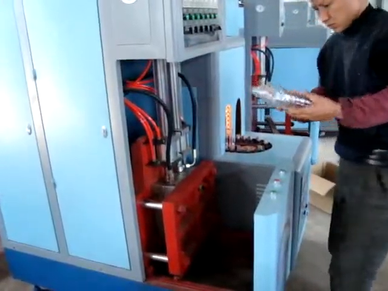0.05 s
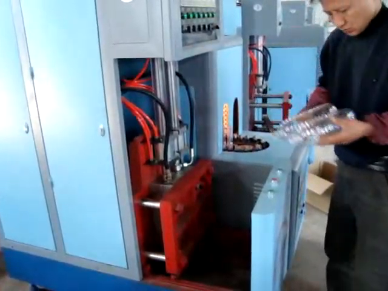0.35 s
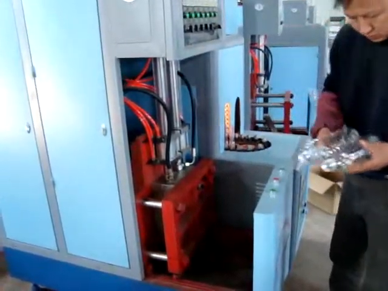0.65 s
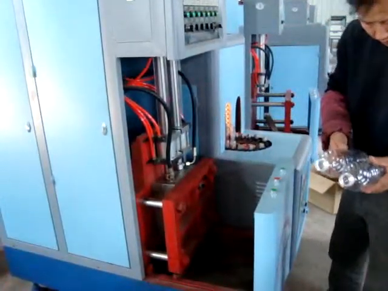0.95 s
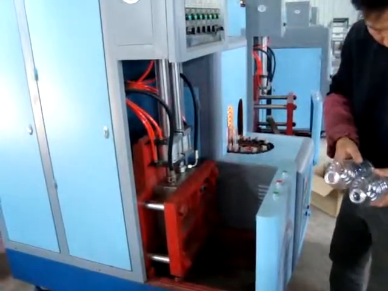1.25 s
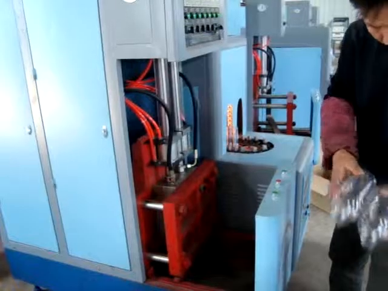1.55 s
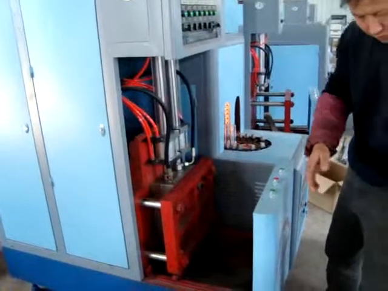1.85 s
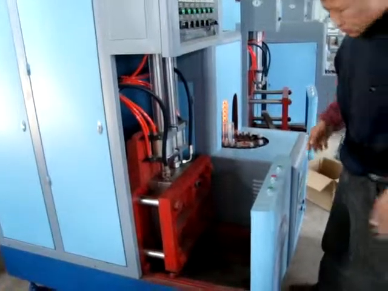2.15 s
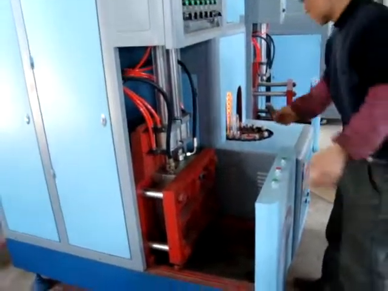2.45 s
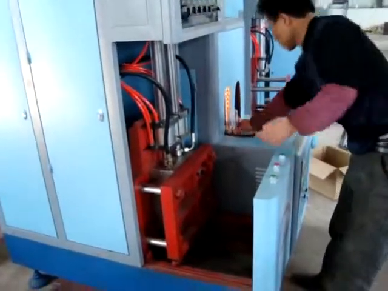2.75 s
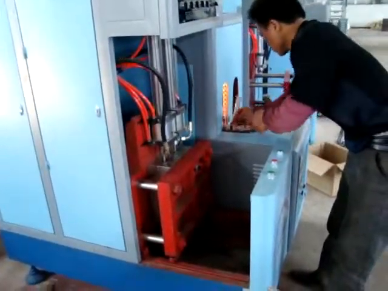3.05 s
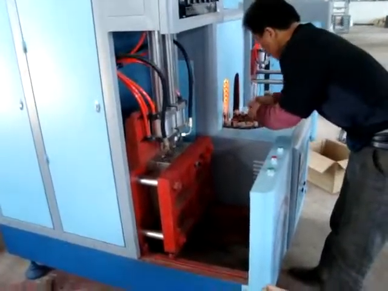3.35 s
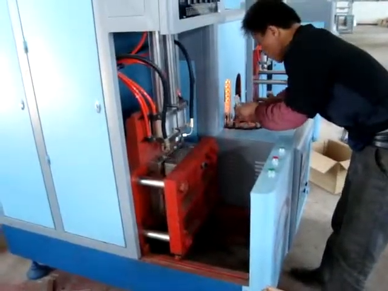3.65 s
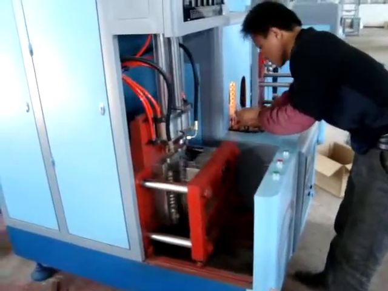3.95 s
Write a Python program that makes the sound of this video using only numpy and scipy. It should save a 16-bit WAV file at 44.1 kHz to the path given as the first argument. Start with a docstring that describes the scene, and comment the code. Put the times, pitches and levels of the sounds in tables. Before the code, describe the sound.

Compressed air spits from a bottle blowing machine and fades to a soft hiss over workshop din. Empty plastic bottles clatter on the floor, then a fresh jet hisses, followed by a loud, faintly whistling rush of exhaust air.

```python
"""Bottle blowing machine in a workshop

Valves spit and vent compressed air, whose turbulence radiates broadband noise. Two empty plastic bottles
drop and clatter, each impact exciting the modes of their shells. A fresh jet hisses, then air rushes out
of a resonant exhaust pipe. Short reflections in the sheet metal cabinet colour the air noise, and a motor
hums in the din of the shop."""
import sys
import numpy as np
from scipy import signal
from scipy.fft import rfft, irfft, next_fast_len
from scipy.io import wavfile
from scipy.ndimage import map_coordinates

SR = 44100
rng = np.random.default_rng(int(sys.argv[2]) if len(sys.argv) > 2 else 0)


def unload_wav(signal):
    """Save mono or channel-first audio to the path in sys.argv[1] as 16-bit WAV at rate SR, clipped to [-1, 1]."""
    wavfile.write(
        sys.argv[1],
        SR,
        np.round(np.clip(np.atleast_2d(signal).T, -1, 1) * 32767).astype(np.int16),
    )


N = 176400
TIME = np.arange(N) / SR


def amp(db):
    """Amplitude ratio of a level in decibels."""
    return 10 ** (np.asarray(db) / 20)


def unit(x):
    """Normalisation to rms 1."""
    return x / np.sqrt(np.mean(x ** 2) + 1e-20)


def along(points, hz):
    """Interpolation on a logarithmic frequency axis."""
    freqs, values = np.transpose(points)
    return np.interp(np.log(hz + 1e-3), np.log(freqs + 1e-3), values)


def envelope(points):
    """Amplitude envelope, interpolated in decibels."""
    return amp(np.interp(TIME, *np.transpose(points)))


def wobble(rate):
    """Smooth random modulation with rate knots a second."""
    return map_coordinates(rng.standard_normal(N // 50), [TIME * rate], mode="mirror")


def filtered(x, response):
    """Linear filtering: the spectrum is multiplied by a frequency response."""
    size = next_fast_len(N + SR // 2)
    return irfft(rfft(x, size) * response(np.fft.rfftfreq(size, 1 / SR)), size)[:N]


def noise(colour_db):
    """Spectrally shaped Gaussian noise of rms 1."""
    return unit(filtered(rng.standard_normal(N), lambda hz: amp(colour_db(hz))))


def narrow(centre, width):
    """Random excitation of a single resonance, at rms 1."""
    return noise(lambda hz: -20 * np.log10(1 + (2 * (hz - centre) / width) ** 2))


def lifts(peaks, hz):
    """Gain in decibels of bell-shaped resonance peaks."""
    return sum(db / (1 + (2 * (hz - centre) / width) ** 2) for centre, width, db in peaks)


CABINET_DB, CABINET_T60_S = -7, .05
def air(colour_db, flutter_db):
    """Comb filtering: turbulent noise interferes with its cabinet reflections; the sum has rms 1."""
    t = np.arange(SR // 10) / SR
    echoes = rng.standard_normal(len(t)) * amp(-60 * t / CABINET_T60_S) * (t > .003)
    echoes *= amp(CABINET_DB) / np.linalg.norm(echoes)
    direct = noise(colour_db) * amp(flutter_db * (wobble(21) + wobble(90)))
    return unit(direct + signal.fftconvolve(direct, echoes)[:N])


def valve(opens, closes, db, sag, attack_s, release_s):
    """Exponential relaxation: flow rises on opening, sags with the pressure and dies after closing."""
    age = np.maximum(TIME - opens, 0)
    rise = 1 - np.exp(-age / attack_s)
    fall = np.exp(-np.maximum(TIME - closes, 0) / release_s)
    return amp(db - sag * age) * rise * fall


# Openings of the jet valves: open_s, close_s, level_db, sag_db_per_s
JETS = [(-.02, 0.195, -20.5, 12), (0.204, 1.0, -35.5, 39), (2.03, 2.79, -25, 15), (2.846, 3.198, -25, -2)]
# Jet spectrum: frequency_hz, level_db
JET_COLOUR = [(300, -39), (1000, -34), (2000, -4.5), (4000, -6.5), (6000, -3.5), (8000, -3), (9800, -1.5)]
SURGE_DB, SURGE_S = 4, .03
def jets():
    """Turbulent jet noise: air at full pressure hisses brightly, surging as each valve opens."""
    out = np.zeros(N)
    for opens, closes, db, sag in JETS:
        surge = amp(SURGE_DB * np.exp(-np.abs(TIME - opens) / SURGE_S))
        flow = valve(opens, closes, db, sag, attack_s=.004, release_s=.02)
        out += surge * flow * air(lambda hz: along(JET_COLOUR, hz), flutter_db=.95)
    return out


# Envelope of the exhaust rush: time_s, level_db
RUSH_LEVEL = [(2.87, -74), (2.876, -23), (2.94, -20.5), (3.13, -21.5), (3.28, -23), (3.45, -22),
              (3.65, -22), (3.85, -20.5), (4, -21.5)]
# Spectrum of the rush: frequency_hz, level_db
RUSH_COLOUR = [(120, -54), (200, -38), (361, -34), (391, -27.5), (552, -26.5), (804, -15.5), (979, -15.5),
               (1130, -7.5), (2740, 1), (9370, -8), (10000, -8), (13000, -56), (22000, -120)]
# Pipe resonances: centre_hz, width_hz, lift_db
PIPE_PEAKS = [(1165, 90, 3), (2280, 80, 2.5), (3190, 91, -3), (5430, 1800, 3)]
# Envelope of the lower roar: time_s, level_db
ROAR_LEVEL = [(2.9, -43), (3.3, -41.5), (3.65, -42), (3.82, -32), (4, -27.5)]
# Spectrum of the roar: frequency_hz, level_db
ROAR_COLOUR = [(200, -41), (550, -17), (800, -10), (1150, -6), (1800, -2), (3000, -10), (10000, -25)]
SPIT_PER_S, SPIT_DB = 90, -20
def exhaust():
    """Source and filter: pipe resonances shape rushing air and droplets while a lower roar builds."""
    colour = lambda hz: along(RUSH_COLOUR, hz) + lifts(PIPE_PEAKS, hz)
    rush = air(colour, flutter_db=.51)
    droplets = rng.uniform(-1, 1, N) * (rng.random(N) < SPIT_PER_S / SR)
    spit = amp(SPIT_DB) * unit(filtered(droplets, lambda hz: amp(colour(hz))))
    roar = envelope(ROAR_LEVEL) * air(lambda hz: along(ROAR_COLOUR, hz), flutter_db=.2)
    is_open = TIME > RUSH_LEVEL[0][0]
    return is_open * (envelope(RUSH_LEVEL) * (rush + spit) + roar)


# Floor contacts of two bouncing bottles: start_s, level_db
LANDINGS = [(1.926, -21.5), (1.9365, -11.5), (1.9405, -10.5), (1.9541, -14.5), (1.9572, -13),
            (1.965, -13.5), (1.976, -30), (1.998, -18.5), (2.017, -23.5), (2.038, -31), (2.05, -26)]
# Modes of the hollow shell: pitch_hz, level_db
SHELL_MODES = [(268, -10), (405, -1), (432, -1.5), (480, -5), (548, -4), (640, -10.5), (780, -10.5),
               (915, -4.5), (1002, -1), (1243, 3.5), (1565, 4), (1800, -4.5), (2280, -8), (2660, 0)]
# Spectrum of the shaken walls: frequency_hz, level_db
CLASH_COLOUR = [(30, -42), (110, -25), (170, -26.5), (260, -7), (330, -6.5), (420, 2), (650, -4), (1000, 0),
                (1550, -3.5), (2700, -4.5), (4000, -9.5), (6000, -13), (10000, -17.5)]
# Decay of the wall vibration: frequency_hz, t60_s
CLASH_T60 = [(100, 0.59), (400, 0.14), (1500, 0.19), (4000, 0.09), (9000, 0.018)]
RING_DB, CLASH_DB, CRACK_DB = -5, -1.5, -3.5
RING_T60_AT_1KHZ_S, DAMPING_EXPONENT = .18, .17
CRACK_HZ, CRACK_WIDTH_HZ, CRACK_T60_S = 2600, 4600, .012
CONTACT_RISE_S, CLATTER_END_S, CLATTER_FADE_S = .00063, 2.053, .005
CLATTER_LOW_CUT_HZ = 130  # a high-pass filter keeps deep bass out of the clatter
def bottles():
    """Impact excitation: each contact cracks, rings the shell's damped modes and shakes its walls."""
    out, t = np.zeros(N + SR), np.arange(SR // 2) / SR
    hz, mode_db = np.transpose(SHELL_MODES)[:, :, None]
    weights = amp(mode_db) / np.linalg.norm(amp(mode_db))
    decay = amp(-60 * t * (hz / 1000) ** DAMPING_EXPONENT / RING_T60_AT_1KHZ_S)
    rise = 1 - np.exp(-t / CONTACT_RISE_S)
    for start, db in LANDINGS:
        modes = np.sin(2 * np.pi * (hz * t + rng.random(hz.shape)))
        ring = amp(RING_DB) * (weights * modes * decay).sum(0)
        walls = noise(lambda f: along(CLASH_COLOUR, f))[:len(t)]
        band_hz, age, bands = signal.stft(walls, SR, nperseg=256)
        bands *= amp(-60 * age / along(CLASH_T60, band_hz)[:, None])
        clash = amp(CLASH_DB) * signal.istft(bands, SR, nperseg=256)[1][:len(t)]
        crack = narrow(CRACK_HZ, CRACK_WIDTH_HZ)[:len(t)] * amp(CRACK_DB - 60 * t / CRACK_T60_S)
        out[round(start * SR):][:len(t)] += amp(db) * (ring + clash + crack) * rise
    highpass = signal.butter(2, CLATTER_LOW_CUT_HZ, "highpass", fs=SR, output="sos")
    abrupt_end = np.exp(-np.maximum(TIME - CLATTER_END_S, 0) / CLATTER_FADE_S)
    return signal.sosfilt(highpass, out[:N]) * abrupt_end


# Puff spectrum: frequency_hz, level_db
PUFF_COLOUR = [(60, -45), (200, -28), (355, -26), (440, -18), (600, -24), (770, -13), (1000, -13),
               (1550, 0), (2200, -4.5), (3400, -8), (4500, -14), (10000, -23)]
def puff():
    """Transient flow: a switching valve releases one ragged burst of turbulence."""
    flow = valve(opens=.021, closes=.058, db=-19.5, sag=0, attack_s=.002, release_s=.034)
    return flow * air(lambda hz: along(PUFF_COLOUR, hz), flutter_db=.9)


# Venting of the cylinder ports: open_s, close_s, level_db, sag_db_per_s, centre_hz
BLEEDS = [(-.02, 1.37, -33, 11.5, 1780), (1.375, 2.4, -40, 24, 3180), (2.038, 2.87, -30, 3.5, 2400)]
# Port spectrum: ratio_to_centre, level_db
BLEED_COLOUR = [(.1, -39.5), (.33, -21.5), (.5, -10), (.75, -8), (1, -2.5), (1.4, -4.5), (2, -9),
                (3, -10.5), (5, -19.5)]
# Housing resonances around the ports: centre_hz, width_hz, lift_db
HOUSING_PEAKS = [(1490, 560, 5), (2050, 270, 0.5), (2680, 520, 3), (4040, 530, 1.5)]
def bleeds():
    """Orifice noise: emptying cylinders hiss softly, each port about its own centre frequency."""
    out = np.zeros(N)
    for *opening, centre in BLEEDS:
        hiss = air(lambda hz: along(BLEED_COLOUR, hz / centre) + lifts(HOUSING_PEAKS, hz), flutter_db=.5)
        out += valve(*opening, attack_s=.002, release_s=.02) * hiss
    return out


# Tones of the exhaust pipe: start_s, stop_s, level_db, sag_db_per_s, pitch_hz, width_hz
WHISTLES = [(2.874, 3.13, -29, 20, 2660, 160), (2.93, 4.6, -44.5, 3.5, 822, 10.7),
            (3.48, 3.88, -33.5, 10, 2700, 110), (2.92, 3.1, -37, 10, 3825, 60)]
def whistles():
    """Flow-excited resonance: the exhaust draws breathy tones from its pipe."""
    return sum(valve(*flow, attack_s=.0026, release_s=.067) * narrow(hz, width)
               for *flow, hz, width in WHISTLES)


# Bumps of handled bottles and parts: peak_s, level_db, centre_hz, width_hz, spread_s
BUMPS = [(0.031, -54, 212, 250, 0.01), (0.15, -60, 191, 200, 0.027), (1.487, -57, 213, 120, 0.022),
         (1.61, -43.5, 820, 500, 0.031), (2.29, -57, 460, 100, 0.016), (2.88, -55.5, 280, 400, 0.028),
         (3.194, -48.5, 310, 80, 0.017), (3.87, -42, 697, 90, 0.023)]
def bumps():
    """Brief resonant response: each dull bump is a band of noise under a Gaussian envelope."""
    return sum(amp(db) * np.exp(-.5 * ((TIME - peak) / spread) ** 2) * narrow(centre, width)
               for peak, db, centre, width, spread in BUMPS)


# Envelope of the shop's din: time_s, level_db
DIN_LEVEL = [(0, -52), (.25, -49.5), (.8, -46.5), (1.35, -40), (1.9, -37.5), (2.1, -55.5), (2.8, -53.5),
             (3.2, -44.5), (3.6, -48), (4, -37.5)]
# Spectrum of the din: frequency_hz, level_db
DIN_COLOUR = [(25, -22), (70, -25), (130, -11), (250, -3), (330, -1), (480, -1), (650, 0), (1100, 1),
              (1700, -2.5), (3500, 0.5), (6000, -10), (10000, -8)]
def shop_din():
    """Continuous spectrum: the shop's machinery blends into broadband noise."""
    return envelope(DIN_LEVEL) * air(lambda hz: along(DIN_COLOUR, hz), flutter_db=.94)


# Envelope of the motor hum: time_s, level_db
HUM_LEVEL = [(0, -70), (.45, -65), (.7, -58), (1.05, -56), (1.3, -49), (1.62, -48.5), (1.78, -60),
             (2.2, -78), (2.75, -63), (3.1, -76), (3.4, -56.5), (3.7, -66), (3.9, -50), (4, -60)]
# Partials of the hum: pitch_hz, level_db
HUM_PARTIALS = [(393, 3.5), (624.5, -6.5), (786, -16)]
HUM_WAVER_DB, HUM_WAVER_RAD = 1.3, .25
def motor_hum():
    """Line spectrum: the motor's partials waver gently in amplitude and phase."""
    hum = np.zeros(N)
    for hz, db in HUM_PARTIALS:
        gain = amp(db + HUM_WAVER_DB * wobble(10))
        hum += gain * np.sin(2 * np.pi * hz * TIME + HUM_WAVER_RAD * wobble(20))
    return envelope(HUM_LEVEL) * unit(hum)


def scene():
    """Superposition: the pressures of all sources add at one point."""
    machine = jets() + exhaust() + bottles() + puff() + bleeds() + whistles()
    return (machine + bumps() + shop_din() + motor_hum())[None]


TOP_HZ = 10080
def record(dry):
    """Band limiting: a steep low-pass filter removes the highest treble."""
    return filtered(dry[0], lambda hz: 1 / np.sqrt(1 + (hz / TOP_HZ) ** 300))[None]


dry = scene()
out = record(dry)
unload_wav(out)
```